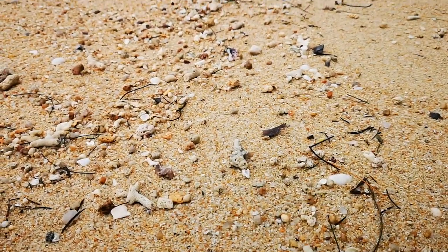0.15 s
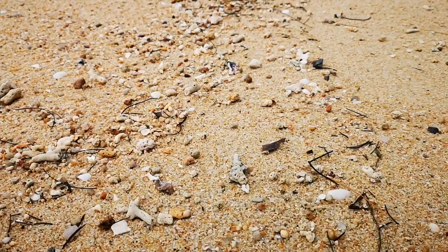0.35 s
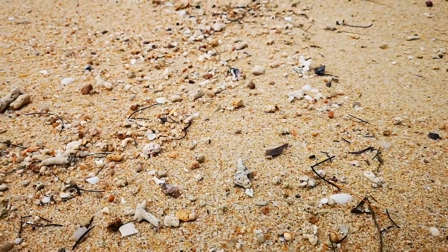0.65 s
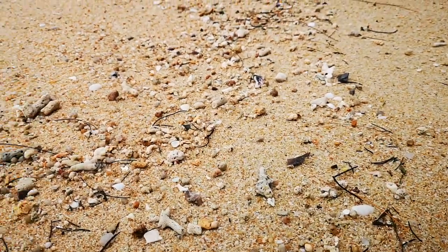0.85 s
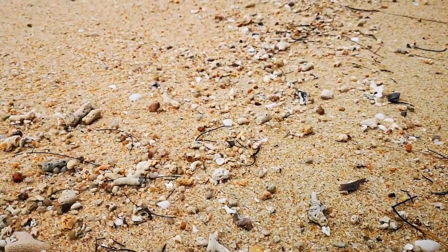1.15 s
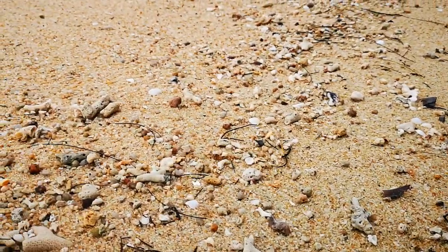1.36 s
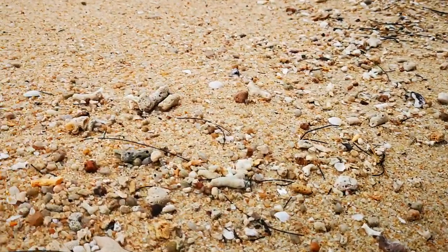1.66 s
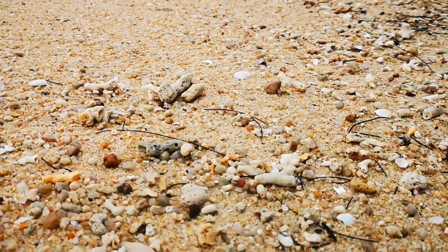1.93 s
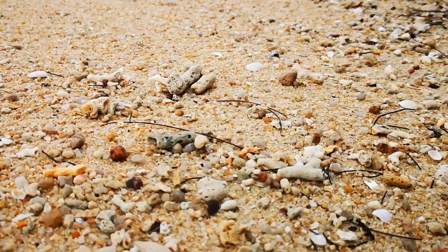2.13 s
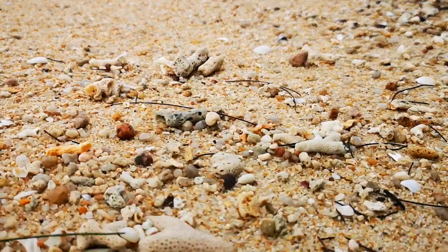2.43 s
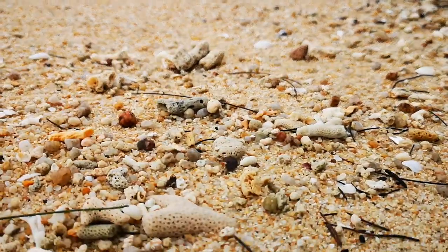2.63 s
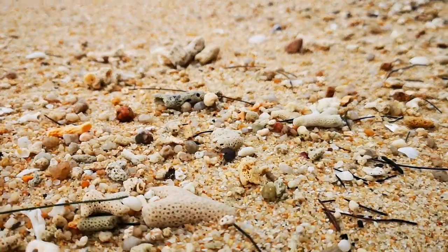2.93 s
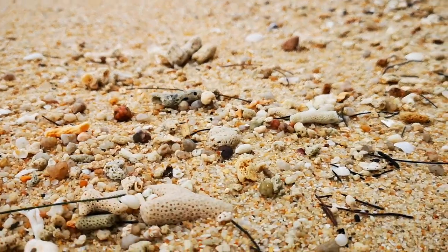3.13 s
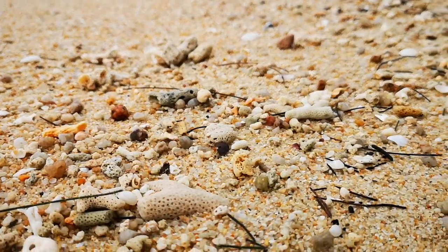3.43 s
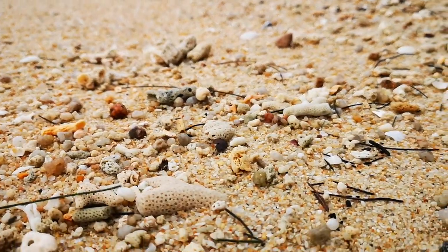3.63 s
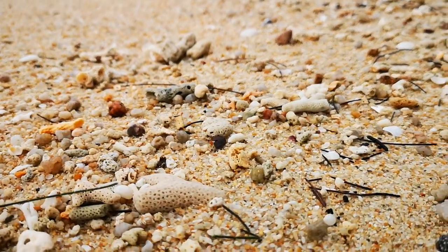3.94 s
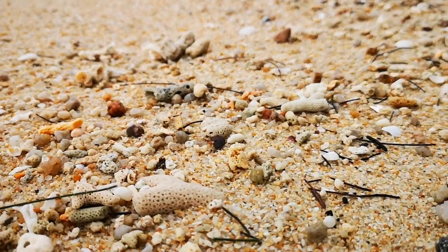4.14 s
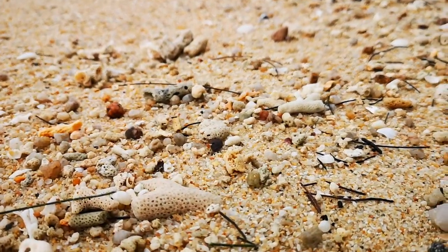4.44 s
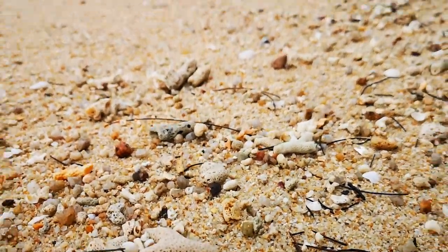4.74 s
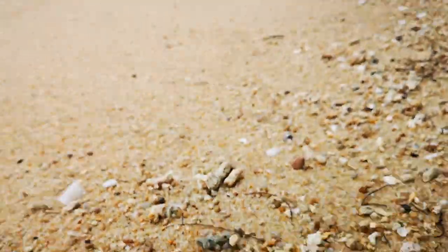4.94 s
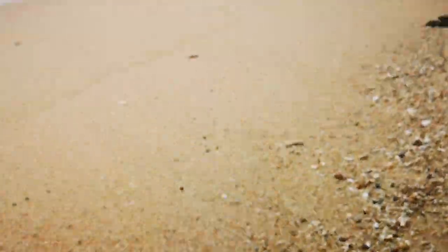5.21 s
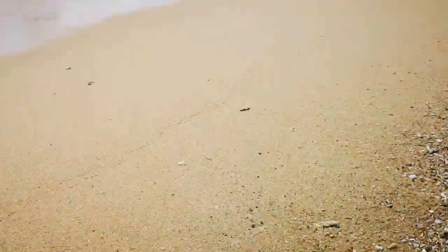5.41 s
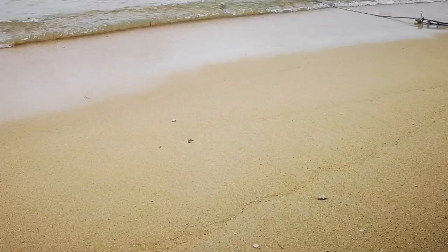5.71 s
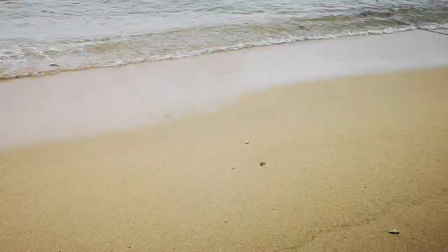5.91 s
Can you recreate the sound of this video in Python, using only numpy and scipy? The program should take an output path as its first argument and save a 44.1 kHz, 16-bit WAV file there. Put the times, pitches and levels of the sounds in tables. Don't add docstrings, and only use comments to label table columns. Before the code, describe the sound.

Steady dull put-put of a distant boat motor, about fourteen thumps a second, behind gentle surf wash, fizzing foam and a few wind pops.

```python
import sys
import numpy as np
from scipy import signal
from scipy.fft import rfft, irfft, next_fast_len
from scipy.io import wavfile
from scipy.ndimage import uniform_filter1d

SR = 44100
rng = np.random.default_rng(int(sys.argv[2]) if len(sys.argv) > 2 else 0)


def wav_out(sig):
    wavfile.write(sys.argv[1], SR, np.round(np.clip(np.atleast_2d(sig).T, -1, 1) * 32767).astype(np.int16))


def ratio_of_db(decibels):
    return 10 ** (np.asarray(decibels, float) / 20)


N = 267731
TIME = np.arange(N) / SR
SIZE = next_fast_len(N + 8192)
HZ = np.maximum(np.fft.rfftfreq(SIZE, 1 / SR), 1)
RIGHT_LATE_S = 21 / SR
LEAD = 882
STROKE = (np.arange(5000) - LEAD) / SR
STEPS_S = np.arange(0, 6.1, .02)


def shape(points):
    hz, db = np.transpose(points)
    return ratio_of_db(np.interp(np.log(HZ), np.log(hz), db))


def bell(centre_hz, octaves):
    return np.exp(-.5 * (np.log2(HZ / centre_hz) / octaves) ** 2)


def filtered(x, gain):
    return irfft(rfft(x, SIZE) * gain, SIZE)[..., :N]


def unit(x):
    return x / np.sqrt(np.mean(x ** 2))


def walk(rate_hz):
    k = int(SR / rate_hz)
    held = np.repeat(rng.standard_normal(N // k + 1), k)
    return 1.05 * uniform_filter1d(uniform_filter1d(held, k), k)[:N]


def arriving(alike):
    shared, left, right = rfft(rng.standard_normal((3, SIZE)))
    share = np.clip(alike, 0, 1)
    late = np.exp(-2j * np.pi * HZ * RIGHT_LATE_S)
    return np.sqrt(share) * np.array([shared, shared * late]) + np.sqrt(1 - share) * np.array([left, right])


def both_ports(x):
    return np.array([x, np.roll(x, round(RIGHT_LATE_S * SR))])


def glide(table, width_hz):
    s, hz, db = np.transpose(table)
    flutter = filtered(rng.standard_normal((2, N)), np.exp(-(HZ / width_hz) ** 2))
    phase = 2 * np.pi * np.cumsum(np.interp(TIME, s, hz)) / SR
    band = unit(flutter[0] * np.cos(phase) + flutter[1] * np.sin(phase))
    return band * ratio_of_db(np.interp(TIME, s, db, left=-200, right=-200))


# f/Hz, level/dB
LEFT_PORT = [(350, 6.5), (500, 6.5), (800, 13), (1300, 7.5), (2000, -0.5), (3000, -0.7), (4500, -1),
             (6000, -2), (7500, -4), (9000, -3), (10000, -14), (11500, -20), (14000, -3.5), (15500, -62)]
RIGHT_PORT = [(350, 9), (700, 7), (1200, 11.5), (2000, 5.5), (2700, 3.5), (3300, 0.5), (4600, 0.6),
              (6000, -2), (7400, -6), (8400, -5), (9400, -0.5), (10300, -4.5), (12000, -10.5),
              (15000, -7.5)]


def port_colour():
    return np.array([shape(LEFT_PORT), shape(RIGHT_PORT)])


def engine():
    s, thump_db, bark_db, crack_db = firings()
    return exhaust(s, thump_db) + gas(s, thump_db, bark_db, crack_db) + hull()


BEAT_S = [.0015, .4336, .8592, 1.2853, 1.7133, 2.1419, 2.5722, 3.0003, 3.4299, 3.8584, 4.2838, 4.7143,
          5.1465, 5.5701, 5.9897, 6.412]
# t/s, thump peak level/dB, clearness of air path/dB
ENGINE = [(0, -30.5, 0), (.6, -30.5, -0.5), (1.2, -31, -3), (1.7, -32, -0.5), (2.15, -33.5, -0.5),
          (2.5, -31.5, 0), (3.0, -30, 1.5), (3.3, -27, 0), (3.6, -26, 3), (4.5, -25.5, 2), (4.8, -31.5, 9),
          (5.4, -28.5, 4), (6.07, -31.5, 5.5)]
# thump/dB, bark/dB, crack/dB
SCATTER_DB = (2.8, -0.5, 2)
# t/s, thump/dB, bark/dB, crack/dB over the rest
ACCENTS = [(1.286, 1.5, 4, 0.5), (1.356, -2.5, -0.5, -6), (1.429, -0.5, 6, 0.5), (1.501, -1, 4, 1),
           (1.643, 0, 6.5, 0.5), (1.857, 1, 3, 1.5), (1.785, -0.5, 4, -4), (1.998, 1.5, 4.5, -2),
           (2.357, 2, -3, 2.5), (2.428, 0.5, 9.5, 4), (2.501, 2, 2, -0.5), (2.785, 1, 4.5, 8.5),
           (2.857, 1, -4, 2), (2.929, 6, 2.5, 2), (3.072, 3.5, -5, 2), (3.144, -0.5, -10, -3),
           (3.215, -3, 3, -0.5), (3.358, -2, 2.5, 3.5), (3.429, 0, 2, 5.5), (3.715, 1.5, 3.5, 2.5),
           (4.0, 1, -7, 1.5), (4.072, -0.5, 3.5, 0), (4.143, -2, 5, 3), (4.213, -1, 3.5, 5),
           (4.355, -3.5, 3, 0), (5.075, 2, 5, 1), (4.93, 2, 6.5, 1), (5.289, 0, 5, 2.5),
           (5.43, 0.5, 2.5, 0), (5.918, 3.5, 9, 7.5)]


def firings():
    s = np.interp(np.arange(86) / 6, np.arange(len(BEAT_S)), BEAT_S)
    at_s, thump_db, clear_db = np.transpose(ENGINE)
    thump_db = np.interp(s, at_s, thump_db)
    clear_db = np.interp(s, at_s, clear_db)
    bark_db = -40.5 + clear_db + 1.27 * (thump_db + 30)
    crack_db = -41.5 + clear_db
    extra_db = rng.standard_normal((len(s), 3)) * SCATTER_DB
    for accent_s, *db in ACCENTS:
        extra_db[np.argmin(np.abs(s - accent_s))] = db
    return (s, *(np.array([thump_db, bark_db, crack_db]) + extra_db.T))


def strikes(s, db):
    out = np.zeros(N)
    out[np.clip((s * SR).astype(int), 0, N - 1)] = ratio_of_db(db)
    return out


# f/Hz, level/dB, t60/s
PIPE = [(170, 14, 0.037), (207, -19, .08), (259.5, -16, 0.11)]


def exhaust(s, thump_db):
    after = np.maximum(STROKE, 0)
    hz = 102 + 200 * np.tanh(np.abs(STROKE - .002) / .0095)
    turns = np.cumsum(hz) / SR
    swell = np.where(STROKE < 0, np.exp(STROKE / .005), np.exp(-(after / .0105) ** 1.2))
    thump = -ratio_of_db(0.5) * swell * np.cos(2 * np.pi * (turns - turns[LEAD]))
    onset = 1 - np.exp(-(after / 0.02) ** 2)
    for ring_hz, db, t60_s in PIPE:
        ring = np.cos(2 * np.pi * ring_hz * (STROKE - .017)) * ratio_of_db(-60 * after / t60_s)
        thump = thump + ratio_of_db(db) * onset * ring
    return both_ports(signal.fftconvolve(strikes(s, thump_db), thump)[LEAD:LEAD + N])


def gas(s, thump_db, bark_db, crack_db):
    patchy_db = 3.8
    late = STROKE + 0.0013
    noise = arriving(alike=0.76) * port_colour()
    knock_db = bark_db - 17.5 + 14 * np.exp(-((s - 1.72) / 0.64) ** 4)
    # f/Hz, width/octaves, level/dB
    bands = [(75.6, 0.26, thump_db - 12.5), (420, 0.59, thump_db - 21.5), (1216, 0.13, knock_db),
             (1950, 0.12, bark_db - 4.9), (2550, 0.15, bark_db - 4.5), (3360, 0.081, crack_db - 10),
             (4165, 0.12, crack_db - 5.5), (5040, 0.069, crack_db - 6), (5860, 0.091, crack_db - 5.5),
             (6830, 0.067, crack_db - 10.5), (7920, 0.12, crack_db - 9.5), (13000, 0.34, crack_db - 26)]
    patches = rng.standard_normal((len(s), len(bands))).T
    out = 0
    for (hz, octaves, db), patch in zip(bands, patches):
        ring_s = 0.0016 + min(4.4 / hz, .014)
        rise = np.exp(np.minimum(late, 0) / 0.0026)
        fall = np.exp(-late / ring_s) + ratio_of_db(-20.5) * np.exp(-late / 0.021)
        puff = np.where(late > 0, fall, rise)
        hits = strikes(s, db + patchy_db * np.clip(patch, -2.5, 1.2))
        gate = signal.fftconvolve(hits, puff)[LEAD:LEAD + N]
        out = out + unit(irfft(noise * bell(hz, octaves), SIZE)[:, :N]) * both_ports(gate)
    return out


# t/s, f/Hz, level/dB
DRONE = [(0, 1000, -56), (1.0, 1000, -57), (1.3, 1000, -64), (2.2, 1000, -61), (2.6, 980, -56),
         (3.3, 1020, -55), (3.8, 1050, -52), (4.3, 1020, -54), (6.07, 1000, -60)]
# t/s, f/Hz, level/dB
HULL_THROB = [(0, 27.5, -46), (6.07, 27.5, -45)]


def hull():
    drone = both_ports(glide(DRONE, width_hz=100)) * ratio_of_db(np.array([[-2], [2]]))
    return drone + glide(HULL_THROB, width_hz=2.7)


# t/s, left minus right/dB
TURN = [(0, -7.5), (.35, 4), (.62, -7.5), (.76, -7.5), (.96, -4.5), (1.3, -6), (2.1, 7), (3.4, 8), (4.3, 2),
        (4.5, 6), (5.04, 10), (5.3, 1), (5.76, -6), (6.07, -19)]


def swells(events, rest_db, pan_share):
    rise_db_s, fall_db_s, tail_db, tail_db_s = 35, 84, -7.5, 17
    power = ratio_of_db(np.array(rest_db)[:, None]) ** 2
    for s, hold_s, db, low_db, high_db in events:
        after = np.maximum(STEPS_S - s - hold_s, 0)
        rise = ratio_of_db(-rise_db_s * np.maximum(s - STEPS_S, 0))
        fall = np.maximum(ratio_of_db(-fall_db_s * after), ratio_of_db(tail_db - tail_db_s * after))
        level = ratio_of_db(db + np.array([[low_db], [0], [high_db]]))
        power = power + (rise * fall * level) ** 2
    pan_db = pan_share * np.interp(STEPS_S, *np.transpose(TURN))
    return np.transpose([STEPS_S, *10 * np.log10(power), pan_db])


def water(table, bands_hz, centres_hz, alike, flicker_db, rate_hz, trim_db):
    s, *levels, pan_db = np.transpose(table)
    ports = port_colour()
    noise = arriving(alike) * ports
    power = np.mean(ports ** 2, axis=0) / len(HZ)
    flat = np.array([db - 10 * np.log10(power[(HZ > a) & (HZ < b)].sum())
                     for db, (a, b) in zip(levels, bands_hz)])
    place = np.log([np.sqrt(a * b) for a, b in bands_hz])
    out, surge = 0, walk(rate_hz / 3)
    for hz in centres_hz:
        db = [np.interp(np.log(hz), place, column) for column in flat.T]
        window = np.cos(np.pi / 2 * np.clip(3 * np.log2(HZ / hz), -1, 1))
        flicker = flicker_db * (0.081 * surge + walk(rate_hz))
        out = out + irfft(noise * window, SIZE)[:, :N] * ratio_of_db(np.interp(TIME, s, db) + flicker)
    pan = np.interp(TIME, s, 0.5 * (pan_db - np.mean(pan_db)))
    return out * ratio_of_db(trim_db + np.array([pan, -pan]) / 2)


# t/s, hold/s, body level/dB, rumble and splash over body/dB
BREAKS = [(0, .65, -49.5, -6.5, 5.5), (.75, 0.21, -50, 1, 7.5), (1.72, 0.094, -69, 4.5, 14.5),
          (2.04, .1, -58.5, -14, -7), (2.65, 0.24, -59, 2.5, -1), (3.05, 0.35, -53.5, -4, -8.5),
          (3.52, 0.37, -49, -1, -6), (4.04, 0.11, -43, -8, -10.5), (4.26, 0.35, -50.5, -2, -2.5),
          (4.72, .2, -46, -6, -0.5), (5.0, 0.39, -53.5, -6, 9), (5.5, 0.42, -46.5, -28.5, 1.5),
          (5.85, .25, -46.5, -12, 0)]
# rumble, body, splash level/dB
BREAK_REST_DB = (-72, -67.5, -80)


def breaker_levels():
    return swells(BREAKS, BREAK_REST_DB, pan_share=-0.12)


# low f/Hz, high f/Hz
BREAKER_BANDS_HZ = [(400, 800), (900, 1500), (1700, 2700)]


def breakers(breaking):
    centres_hz = 400 * 2 ** (np.arange(9) / 3)
    alike = .7 - .5 * np.tanh(HZ / 2500)
    return water(breaking, BREAKER_BANDS_HZ, centres_hz, alike, flicker_db=3.0, rate_hz=14, trim_db=0.0)


# t/s, hold/s, fizz level/dB, hiss and top fizz over fizz/dB
WASHES = [(.15, 0.024, -59.5, 9.5, -34), (.34, 0.41, -42, -3.5, -17.5), (.82, 0.16, -46, 0.5, -22),
          (1.7, 0.25, -61.5, 0, -12.5), (3.5, .4, -71.5, 6, -12), (4.12, 0.073, -60.5, 4.5, -16),
          (4.68, 0.06, -52.5, 6, -16), (4.85, 0.15, -47, 4, -12), (5.22, 0.23, -56.5, 2, -28),
          (5.58, 0.21, -51, -9, -10), (5.86, 0.034, -48, -3, -12)]
# hiss, fizz, top fizz level/dB
WASH_REST_DB = (-66.5, -66, -81.5)


def wash_levels():
    return swells(WASHES, WASH_REST_DB, pan_share=0.95)


# low f/Hz, high f/Hz
FOAM_BANDS_HZ = [(3300, 6000), (6800, 9600), (11000, 14500)]


def foam(washing):
    centres_hz = 400 * 2 ** (np.arange(9, 17) / 3)
    return water(washing, FOAM_BANDS_HZ, centres_hz, alike=0.066, flicker_db=2.0, rate_hz=25, trim_db=0.5)


# f/Hz, width/Hz, level over fizz/dB
PORT_RINGS = [(4790, 560, -7.5), (7440, 810, -2), (9270, 290, -8)]


def port_rings(washing):
    s, _, fizz_db, _, pan_db = np.transpose(washing)
    right_db = fizz_db - .75 * pan_db
    rings = 0
    for hz, width_hz, db in PORT_RINGS:
        rings = rings + glide(np.transpose([s, hz + 0 * s, right_db + db]), width_hz)
    return rings * ratio_of_db(0.5 * walk(29)) * np.array([[.15], [1]])


# t/s, f/Hz, level/dB
CURL = [(3.8, 2550, -59), (4.05, 2550, -47.5), (4.4, 2357, -46.5), (4.6, 2050, -40.5), (4.77, 1880, -37.5),
        (4.93, 2050, -37.5), (5.05, 2002, -47.5), (5.7, 1950, -54), (6.07, 1950, -61)]


def curl():
    return glide(CURL, width_hz=280) * ratio_of_db(2.5 * walk(45) + np.array([[-8], [2]]))


# t/s, peak level/dB, f/Hz, left minus right/dB, length/ms
DROPS = [(0.757, -33, 7600, -16, 1.6), (.912, -38, 7500, -7, 1.6), (0.963, -33, 4260, -8, 6.5),
         (2.147, -51, 12000, -12, 1), (2.165, -54, 12200, -5, 1), (2.269, -58, 12200, -2, 1),
         (3.522, -39, 2950, -2, 2.4), (4.458, -37, 3470, -3, 2.5), (4.61, -43, 11700, 3, 1),
         (5.202, -45, 9300, 0, 1.2), (5.35, -32, 8000, -5, 1.3), (5.812, -35, 9000, -10, 0.71)]


def drops():
    out, t = np.zeros((2, N + 1024)), np.arange(1024) / SR
    hz = np.maximum(np.fft.rfftfreq(1024, 1 / SR), 1)
    grits = rng.standard_normal((len(DROPS), 1024))
    for (s, db, pitch_hz, pan_db, ms), grit in zip(DROPS, grits):
        colour = np.exp(-(np.log2(hz / pitch_hz) / 0.55) ** 2)
        tick = unit(irfft(rfft(grit) * colour)) * np.exp(-1000 * t / ms)
        start = int(s * SR)
        out[:, start:start + 1024] += 1.08 * tick * ratio_of_db(db + np.array([[pan_db], [-pan_db]]) / 2)
    return out[:, :N]


# t/s, f/Hz, level/dB
SQUEAKS = [
    [(.88, 13500, -78), (.93, 14100, -66), (.98, 14250, -62), (1.02, 13950, -65), (1.055, 13500, -74)],
    [(1.06, 14500, -74), (1.075, 14400, -67), (1.1, 14000, -74)],
    [(4.51, 13600, -72), (4.53, 14100, -64), (4.55, 14500, -72)],
]


def squeaks():
    return sum(glide(call, width_hz=12) for call in SQUEAKS) * ratio_of_db(np.array([[-3], [6]]))


# t/s, peak level/dB, push/s, sign
POPS = [
    (1.213, -31, .004, -1),
    (5.148, -22, 0.011, -1),
    (5.346, -24, 0.0052, -1),
    (5.456, -13.5, 0.0036, 1),
    (5.504, -27, .008, 1),
    (5.545, -27, 0.0051, 1),
]


def pops():
    out = np.zeros(N)
    for s, db, push_s, sign in POPS:
        u = (TIME - s) / push_s
        out += np.sign(sign) * ratio_of_db(db) * (1 - 0.59 * u ** 2) * np.exp(-.45 * u ** 2)
    return out


# t/s, peak level/dB, half length/s
GUSTS = [(.6, -50, 0.16), (1.26, -41, .15), (1.909, -34, 0.013), (2.763, -39, 0.076), (4.598, -53, 0.085),
         (3.98, -38, 0.16), (4.31, -34.5, 0.098), (4.45, -35, 0.052), (4.79, -39.5, 0.072),
         (5.025, -33, 0.047), (5.136, -29, 0.04), (5.37, -24, 0.047), (5.48, -24, 0.093),
         (5.73, -32, 0.068), (6.07, -28, 0.056)]
# f/Hz, level/dB per Hz
LOW_COLOUR = [(12, -3), (28, -7), (45, -7), (62, -0.5), (85, -5), (130, -10), (250, -17), (400, -25.5)]


def wind(rumble_db):
    breeze_db = -52.5 + 0 * STEPS_S
    boom_db = -44.5 + 0.37 * (rumble_db + 57)
    gusts_db = [db - 6 * ((STEPS_S - at_s) / half_s) ** 2 for at_s, db, half_s in GUSTS]
    buffet_db = np.max([breeze_db] + gusts_db, axis=0)
    noise = arriving(alike=1.0) * shape(LOW_COLOUR) * (HZ < 420)
    gust = walk(16)
    split = 1 / (1 + (HZ / 75) ** 4)
    buffet = unit(irfft(noise * np.sqrt(split), SIZE)[:, :N])
    boom = unit(irfft(noise * np.sqrt(1 - split), SIZE)[:, :N])
    buffet = buffet * ratio_of_db(np.interp(TIME, STEPS_S, buffet_db) + 1.85 * gust - 3.0)
    return buffet + boom * ratio_of_db(np.interp(TIME, STEPS_S, boom_db) + 0.74 * gust)


def scene():
    breaking, washing = breaker_levels(), wash_levels()
    surf = breakers(breaking) + foam(washing) + port_rings(washing) + curl()
    near = drops() + squeaks()
    return engine() + surf + near + pops() + wind(rumble_db=breaking[:, 1])


def band_limit(x):
    return signal.sosfilt(signal.butter(12, 15700, fs=SR, output="sos"), x)


def record(dry):
    top = 1 / np.sqrt(1 + (HZ / 15000) ** 300)
    mix = filtered(dry, top)
    return band_limit(mix)


dry = scene()
out = record(dry)
wav_out(out)
```